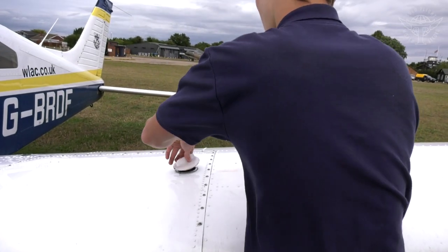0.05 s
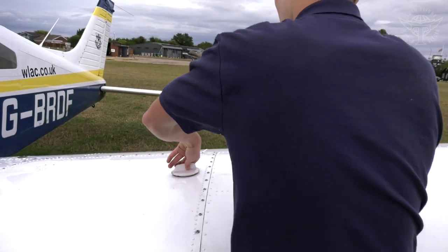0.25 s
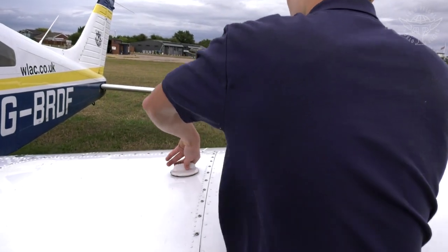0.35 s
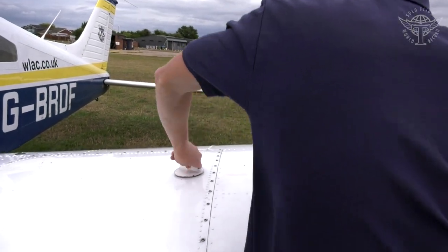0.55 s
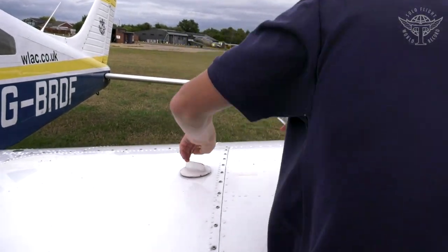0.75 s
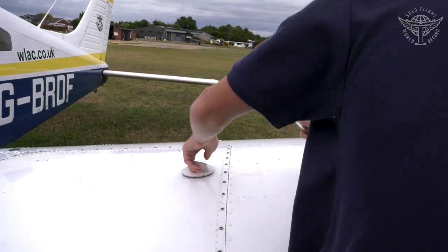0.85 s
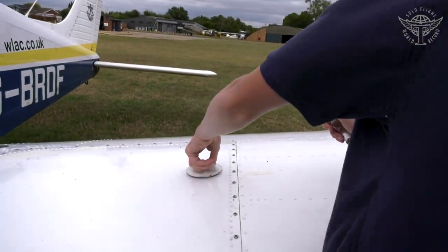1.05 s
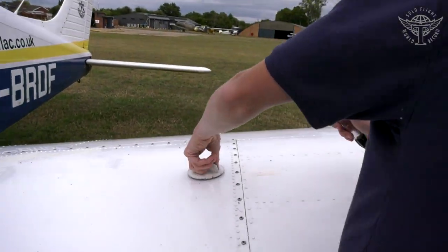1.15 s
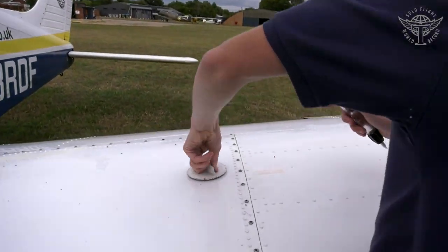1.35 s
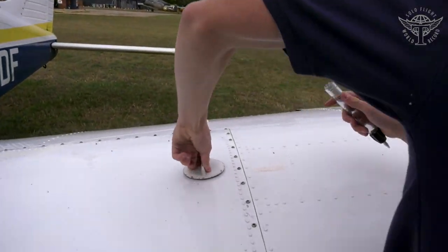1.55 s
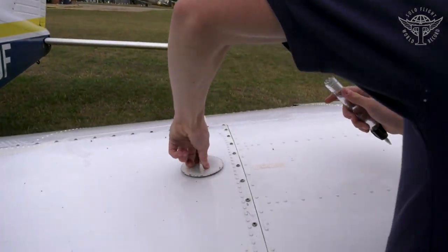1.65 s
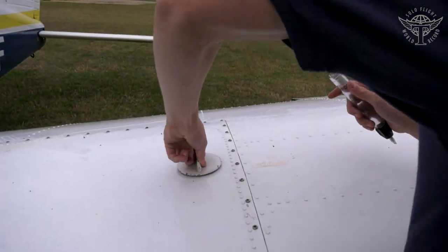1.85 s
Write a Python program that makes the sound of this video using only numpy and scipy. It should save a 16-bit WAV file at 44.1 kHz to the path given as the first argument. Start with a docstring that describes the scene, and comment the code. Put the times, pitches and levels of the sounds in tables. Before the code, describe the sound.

Close up, a metal cap clacks onto a hollow wing tank and shifts with soft taps. After a pause it twists shut with gritty scraping, tiny squeaks and a snap, while an open airfield rumbles low behind.

```python
"""Closing an aircraft's fuel cap

A metal cap is dropped into the filler neck of a light aircraft's wing, shifted and twisted shut.
Each knock makes the cap clack and the thin wing skin boom over the hollow tank.
Between knocks, metal grinds and squeaks on metal. An open airfield rumbles behind it all."""
import sys
import numpy as np
from scipy import signal
from scipy.fft import rfft, irfft
from scipy.io import wavfile

SR = 44100
rng = np.random.default_rng(int(sys.argv[2]) if len(sys.argv) > 2 else 0)


def wrap_up_sound(samples):
    """Save the sound to the file named by the first command line argument, as 16-bit audio."""
    columns = np.atleast_2d(samples).T
    # keep every value between -1 and 1, then stretch to whole-number steps
    tamed = np.clip(columns, -1, 1)
    steps = np.round(tamed * 32767).astype(np.int16)
    wavfile.write(sys.argv[1], SR, steps)


N = 83790

# Each time the cap hits the neck. A higher tilt sounds brighter; peak_hz is boosted in the clack.
# start_s, clack_db, boom_db, clack_tilt_db_per_octave, peak_hz, boom_tilt_db_per_octave, panel_hz
KNOCKS = [(0.2155, -21, -7, -2, 6700, 0, 349), (0.2341, -11.5, -4, -4.5, 6000, -1.5, 505.4),
          (0.2411, -22, -1.5, -14, 2480, 1, 659), (0.297, -17.5, -6.5, -5.5, 7000, -6.5, 369.4),
          (0.3115, -16.5, -10, -6, 7200, 0, 384), (0.3168, -22, -16, -3, 4400, 3, 864.7),
          (.3325, -30, -17, .5, 5240, -1, 428), (0.4454, -32, -20.5, -10.5, 4600, -4.5, 148),
          (.583, -34, -21.5, -8, 7320, -2.5, 727), (.614, -30.5, -19.5, -1, 8200, 1, 697),
          (0.622, -41, -13, 12, 8300, -0.5, 755), (.642, -27.5, -23.5, 2, 5720, 4, 332),
          (1.3546, -28, -17.5, -0.5, 8100, 2, 739), (1.3898, -37, -21.5, 0, 8800, -3.5, 295),
          (1.429, -38, -20.5, -6, 3140, 0, 832), (1.559, -38, -13.5, 15, 9100, -1, 636),
          (1.5698, -17.5, -12.5, 0.5, 3150, 7.5, 517.5), (1.616, -29.5, -20, -4.5, 11400, 6, 375)]


def knocks(wings):
    """Each knock clacks the cap, makes the panel under it clunk and sets the whole wing booming."""
    echo_delay_s, echo_db = .009, -12  # the clack bounces off the side of the aircraft
    out, t = np.zeros(N), np.arange(SR // 5) / SR
    for knock, wing in zip(KNOCKS, wings):
        start_s, clack_db, boom_db, clack_tilt, peak_hz, boom_tilt, panel_hz = knock
        clack = gain(clack_db) * cap_clack(t, clack_tilt, peak_hz)
        clunk = normalize(np.sin(2 * np.pi * panel_hz * t) * fade(t, ring_s=.15) * rise(t))
        add(out, start_s, clack)
        add(out, start_s + echo_delay_s, gain(echo_db) * clack)
        add(out, start_s, gain(boom_db + 12) * clunk)
        add(out, start_s, gain(boom_db) * tilt(wing, boom_tilt))
    return out


# The tones the cap rings with: pitch_hz, level_db, ring_s
CAP_TONES = [(3010, -15, 0.081), (3530, -6, 0.049), (4175, -3, 0.028), (5720, -10, 0.031), (5770, 0, 0.015),
             (6350, -15, 0.04)]
# The tone colour of the crack as metal meets metal: pitch_hz, level_db
CRACK_COLOUR = [(300, -72), (1500, -10.5), (3500, 4.5), (5000, 2.5), (6200, 4), (8000, -4.5), (11000, -6),
                (16000, -12)]


def cap_clack(t, tilt_db_per_octave, peak_hz):
    """A sharp crack and a metal ring, kept short by the hand holding the cap."""
    peak_db, peak_width_octaves = 9, .36
    crack = normalize(colour(rng.standard_normal(len(t)) * fade(t, ring_s=.015), CRACK_COLOUR))
    tones = normalize(sum(gain(db) * np.sin(2 * np.pi * (hz * t + rng.random())) * fade(t, ring_s)
                          for hz, db, ring_s in CAP_TONES))
    clack = (gain(-1) * tones + gain(3.5) * crack) * rise(t, rise_s=.0002)
    pitches = np.geomspace(2000, 16000, 40)
    slope_db = tilt_db_per_octave * np.log2(pitches / pitches[0])
    bump_db = peak_db * np.exp(-(2 * np.log2(pitches / peak_hz) / peak_width_octaves) ** 2)
    return colour(clack, np.c_[pitches, slope_db + bump_db])


def wing_booms(start_times):
    """How the wing answers each touch: clear tones, a blur of weaker ones and a thud."""
    t = np.arange(SR * 2 // 3) / SR
    booms = []
    for start_s, panels in zip(start_times, panel_rings(t, len(start_times))):
        booms.append(gain(12) * skin_ring(t, start_s) + gain(11.5) * panels + gain(8) * skin_thud(t))
    bass_cut = signal.butter(2, 87, "high", fs=SR, output="sos")  # thin skin gives off little deep bass
    return signal.sosfilt(bass_cut, booms)


# The main tones of the wing skin and tank: pitch_hz, level_db, ring_s
WING_TONES = [(147, -10, .5), (219, -9, .4), (283, -2, .4), (331, -2, .5), (360, -1, .4), (384, -4, .35),
              (512, 0, .42), (622, -4, .3), (742, -3, .28), (857, -7, .42), (912, -11, .42),
              (1368, -20, .25), (1523, -18, .24)]


def skin_ring(t, start_s):
    """The skin rings with the same tones each time, but in a different mix."""
    grip_from_s, spread_db = .5, 3.5
    tones = np.array([gain(db) * np.sin(2 * np.pi * hz * t) * fade(t, ring_s)
                      for hz, db, ring_s in WING_TONES])
    if start_s > grip_from_s:  # the hand leans on the cap and muffles the skin, high tones most
        tones *= np.array([fade(t * hz / 1000, ring_s=.35) for hz, _, _ in WING_TONES])
    shares = rng.choice([-1, 1], len(tones)) * gain(spread_db * rng.standard_normal(len(tones)))
    return normalize(shares @ tones * rise(t))


# The wing panels' many weaker tones, taken in bands: pitch_hz, level_db, ring_s
PANEL_BANDS = [(40, -37, 0.93), (117, -1, 0.39), (263, -2, 0.68), (353, 3, 0.8), (753, 1, 0.27),
               (1035, -8.5, 0.33), (2020, -17, 0.096), (3970, -33, 0.14), (12000, -55, 0.17)]


def panel_rings(t, count):
    """Tones so crowded that they blur into noise, each band dying away at its own speed."""
    hz, db, ring_times = np.array(PANEL_BANDS).T
    log_pitch = np.log(np.maximum(np.fft.rfftfreq(len(t), 1 / SR), 1))
    phases = np.exp(2j * np.pi * rng.random((count, len(log_pitch))))
    spectra = phases * gain(np.interp(log_pitch, np.log(hz), db))
    bands = [np.interp(log_pitch, np.log(hz), row) for row in np.eye(len(hz))]
    rings = sum(irfft(spectra * band, len(t)) * fade(t, ring_s)
                for band, ring_s in zip(bands, ring_times))
    return [normalize(panels * rise(t)) for panels in rings]


# The tone colour of the thud: pitch_hz, level_db
THUD_COLOUR = [(30, -61), (90, -27), (200, -16), (320, 2), (750, 2.5), (1100, -7), (1700, -17), (3500, -40),
               (16000, -80)]


def skin_thud(t):
    """A dull thud as the skin first bends around the neck."""
    return normalize(colour(burst(fade(t, ring_s=.04)), THUD_COLOUR))


# The rim rubbing in the neck, one list of points per stroke: time_s, grit_db, drone_db
STROKES = [
    [(.236, -38, -57), (.26, -45.5, -18.5), (.285, -58, -23.5), (.305, -47, -18), (.33, -44.5, -63),
     (.345, -59.5, -57), (.39, -70, -45)],
    [(.54, -71, -37.5), (.567, -60, -36.5), (.605, -63, -28.5), (.62, -59, -58), (.648, -59, -26.5),
     (.68, -95, -45.5)],
    [(1.318, -63.5, -46.5), (1.342, -70, -38), (1.352, -53, -29), (1.40, -66, -33.5), (1.423, -53, -30),
     (1.458, -64.5, -39.5), (1.482, -54, -37.5), (1.513, -57.5, -34), (1.533, -58, -55), (1.55, -61, -24),
     (1.564, -40, -27), (1.582, -58, -33), (1.625, -59, -39), (1.66, -61.5, -48), (1.76, -69.5, -55)],
]
# How bright the wing's drone is in each stroke: tilt_db_per_octave
DRONE_TILTS = [2, -1.5, 1.26]
# The tone colour of the gritty hiss: pitch_hz, level_db
GRIT_COLOUR = [(500, -24), (2000, 5.5), (3100, 8.5), (4300, 4.5), (5700, 1.5), (6400, -1.5), (7700, -6),
               (8600, -3.5), (9900, -8), (16000, -27)]


def rubbing(wings):
    """The rim moves in thousands of tiny slips, which hiss and make the wing drone."""
    slips_per_s, spread_db = 3200, 1.5
    out, t = np.zeros(N), np.arange(N) / SR
    for stroke, drone_tilt, wing in zip(STROKES, DRONE_TILTS, wings):
        time_s, grit_db, drone_db = np.array(stroke).T
        sizes = gain(spread_db * np.minimum(rng.exponential(size=N), 4))
        slips = (rng.random(N) < slips_per_s / SR) * sizes * catching(t, spread_db=1.5)
        slips = normalize(slips * rng.choice([-1, 1], N)) * np.sqrt(N)
        slips *= (t > time_s[0]) & (t < time_s[-1])
        tick = burst(fade(t[:SR // 20], ring_s=.005))  # the sound of one slip
        grit = ring(slips * gain(np.interp(t, time_s, grit_db)), tick)
        drone = ring(slips * gain(np.interp(t, time_s, drone_db)), normalize(tilt(wing, drone_tilt)))
        out += colour(grit, GRIT_COLOUR) + drone
    return out


# The rim's squeaks (a smaller width is a purer tone): start_s, length_s, pitch_hz, width_hz, level_db
SQUEAKS = [(0.259, 0.034, 5900, 280, -45.5), (0.576, 0.059, 7700, 700, -66),
           (1.395, 0.065, 10700, 220, -71), (1.462, 0.11, 10720, 240, -70), (1.403, 0.037, 9150, 450, -66),
           (1.456, 0.069, 8300, 450, -65.5), (1.548, 0.036, 5900, 250, -53)]


def squeaks():
    """Sticking and slipping keeps one high tone of the rim ringing for a moment."""
    out = np.zeros(N)
    for start_s, length_s, pitch_hz, width_hz, level_db in SQUEAKS:
        t = np.arange(int(length_s * SR)) / SR
        rim_ring = np.sin(2 * np.pi * pitch_hz * t) * t * np.exp(-2 * np.pi * width_hz * t)
        tone = ring(rng.standard_normal(N)[:len(t)], rim_ring)
        swell = np.sqrt(np.sin(np.pi * t / length_s))
        squeak = normalize(tone * catching(t, spread_db=4) * swell) * np.sqrt(len(t))
        add(out, start_s, gain(level_db) * squeak)
    return out


def catching(t, spread_db, catches_per_s=180):
    """The loudness flutters as the rim catches and lets go."""
    return gain(spread_db * np.interp(t * catches_per_s, np.arange(N), rng.standard_normal(N)))


# The tone colour of the airfield's rumble: pitch_hz, level_db
RUMBLE_COLOUR = [(20, -20), (60, -5), (95, -4), (125, 5.5), (175, -7.5), (250, 2), (330, -1), (450, -11),
                 (700, -16), (1300, -25.5), (2200, -37), (5000, -43.5), (16000, -48)]
# How loud the rumble is over time: time_s, level_db
RUMBLE_LEVELS = [(0, -46.5), (.5, -43), (0.901, -44.5), (1.149, -47.5), (1.3, -46.5), (1.6, -44),
                 (1.9, -42.5)]


def airfield():
    """A distant rumble that slowly swells and sinks."""
    time_s, level_db = np.array(RUMBLE_LEVELS).T
    rumble = colour(rng.standard_normal(N + SR), RUMBLE_COLOUR)[SR:]
    return rumble * gain(np.interp(np.arange(N) / SR, time_s, level_db))


def gain(db):
    """Turn decibels into a number to multiply by."""
    return 10 ** (np.asarray(db) / 20)


def normalize(x):
    """Scale a sound to a total energy of one."""
    return x / np.sqrt(np.sum(x ** 2))


def rise(t, rise_s=.0015):
    """Climb quickly from silence to full level."""
    return 1 - np.exp(-t / rise_s)


def fade(t, ring_s):
    """Die away, falling 60 dB in ring_s seconds."""
    return np.exp(-np.log(1000) * t / ring_s)


def ring(pushes, response):
    """Let every push set off its own copy of a response."""
    return signal.fftconvolve(pushes, response)[:len(pushes)]


def colour(x, points):
    """Shape a sound's lows and highs along (pitch_hz, level_db) points; white noise keeps its power."""
    hz, db = np.array(points).T
    pitches = np.maximum(np.fft.rfftfreq(4096, 1 / SR), 1)
    cepstrum = irfft(np.log(gain(np.interp(np.log(pitches), np.log(hz), db))))
    # Fold it in half so the filter never rings before the sound arrives.
    cepstrum[1:len(cepstrum) // 2] *= 2
    cepstrum[len(cepstrum) // 2 + 1:] = 0
    return ring(x, normalize(irfft(np.exp(rfft(cepstrum)))))


def tilt(x, db_per_octave):
    """Make a sound brighter (a harder touch) or duller (a softer one), keeping its energy."""
    return normalize(colour(x, [(125, 0), (2000, 4 * db_per_octave)])) * np.sqrt(np.sum(x ** 2))


def burst(envelope):
    """A puff of noise, evened out so that no pitch stands out."""
    noise = rng.standard_normal(len(envelope)) * envelope
    phases = np.angle(rfft(noise, 2 * len(noise)))
    even_noise = irfft(np.exp(1j * phases))[:len(noise)]
    return normalize(even_noise * envelope ** (1 / 4))


def add(out, start_s, x):
    """Mix a sound in at a given time."""
    i = int(start_s * SR)
    out[i:i + len(x)] += x[:len(out) - i]


def scene():
    """The cap and wing close by, the airfield behind, in one channel."""
    wings = wing_booms([stroke[0][0] for stroke in STROKES] + [knock[0] for knock in KNOCKS])
    rubbed, struck = wings[:len(STROKES)], wings[len(STROKES):]
    return (rubbing(rubbed) + knocks(struck) + squeaks() + airfield())[None]


def record(dry):
    """Soften the highest treble, then cut off the very top."""
    soften_hz, cut_hz = 14500, 15800
    soft = signal.sosfilt(signal.butter(2, soften_hz, fs=SR, output="sos"), dry)
    return signal.sosfilt(signal.ellip(10, .1, 80, cut_hz, fs=SR, output="sos"), soft)


dry = scene()
out = record(dry)
wrap_up_sound(out)
```